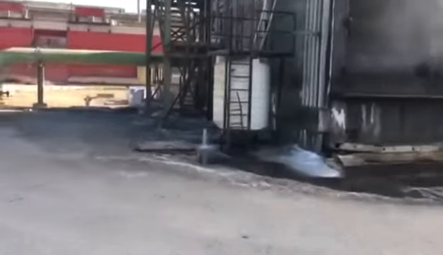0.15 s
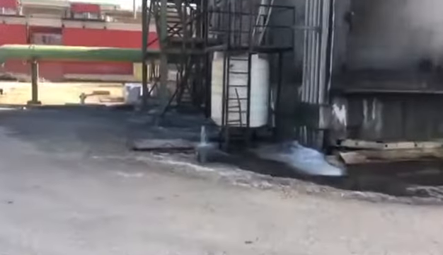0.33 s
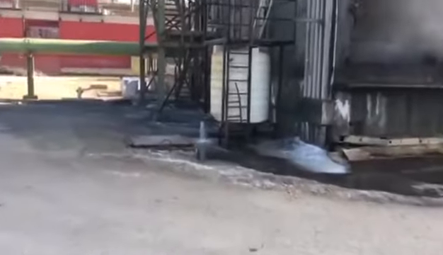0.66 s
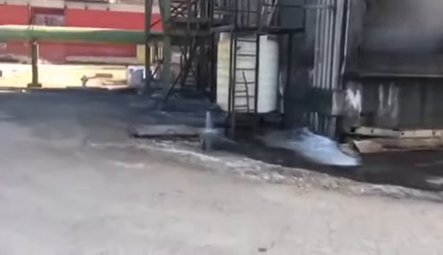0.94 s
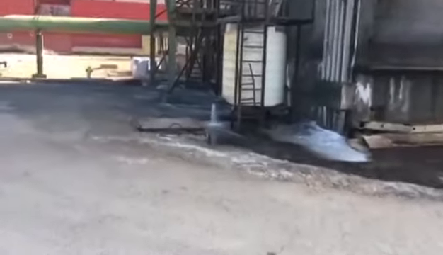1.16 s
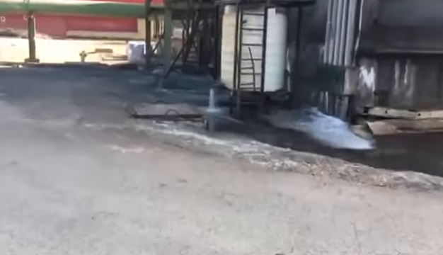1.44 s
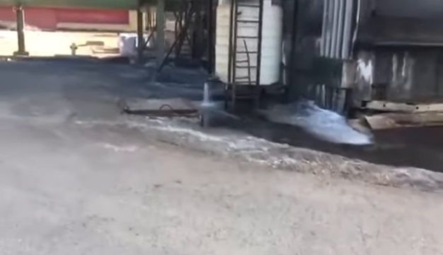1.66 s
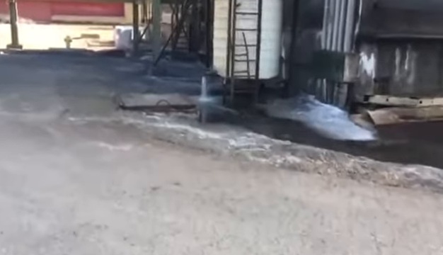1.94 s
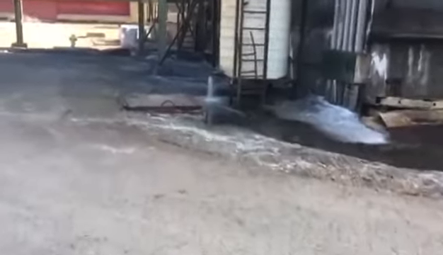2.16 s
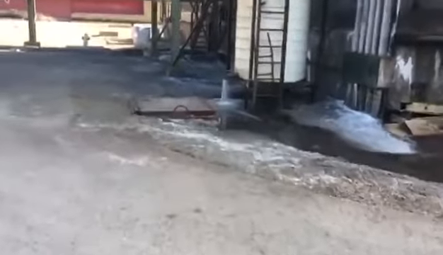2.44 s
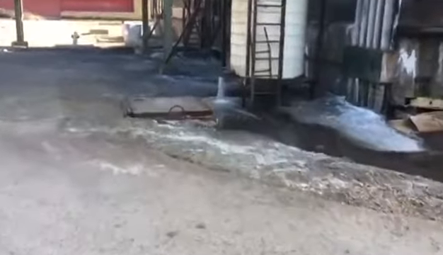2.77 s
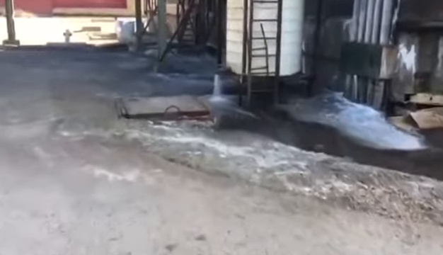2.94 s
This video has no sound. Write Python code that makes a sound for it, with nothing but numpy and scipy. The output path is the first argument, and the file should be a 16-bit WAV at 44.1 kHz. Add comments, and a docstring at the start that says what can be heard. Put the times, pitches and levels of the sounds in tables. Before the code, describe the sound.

Continuous water splash in an open industrial yard, heard from a few metres through one microphone, the same in both channels. Machinery rumbles unevenly, fans roar, a pump whines; a hollow drain ring swells briefly early on.

```python
"""Water gushes onto wet concrete some metres away in an industrial yard; one microphone feeds both channels.
From the start patchy noise and bursting drops hiss, over the plant's lumpy noise rumble and steadier roar;
a pump whines, a tone with shaft sidebands in a narrow noise band, swinging at first and then settling.
A narrow noise ring in the drain swells near 0.7 s; the outlet's ring drops by 1.7 s as a thin sine fades.
The water dips briefly near 2.16 s, and from 2.6 s the whine swings widely. The treble flickers throughout."""
import sys
import numpy as np
from scipy import signal
from scipy.fft import rfft, irfft, next_fast_len
from scipy.io import wavfile
from scipy.ndimage import uniform_filter1d, map_coordinates

SR = 44100
rng = np.random.default_rng(int(sys.argv[2]) if len(sys.argv) > 2 else 0)


def wav_record(signal):
    """Record a signal, one row per channel, as 16-bit PCM in the file named by sys.argv[1]."""
    frames = np.transpose(np.atleast_2d(signal))
    bounded = np.clip(frames, -1, 1)
    # unit amplitude maps onto the largest positive 16-bit level
    quanta = np.round(bounded * 32767).astype(np.int16)
    wavfile.write(sys.argv[1], SR, quanta)


def voltage_ratio(level):
    """Linear amplitude factor for a level in decibels (scalar or array-like)."""
    return 10 ** (np.asarray(level, float) / 20)


N = 137151

# Surge of the splash, as the level of its treble part: t/s, level/dB
SPLASH_SURGE = [(0.0, -32), (0.03, -33.5), (0.96, -33), (2.12, -34), (2.16, -36.5), (2.2, -34.5),
                (2.82, -34.5), (3.11, -34)]
# Spectrum of the splash, relative density: f/Hz, level/dB
SPLASH_COLOUR = [(500, -58), (900, -11.5), (1250, -5), (1600, -1.5), (2000, -1.5), (2400, -5.5),
                 (4500, -8.5), (4900, -10), (6900, -10.5), (8600, -13), (9000, -14), (9210, -31),
                 (9280, -95)]
# Water rushing in the outlet: t/s, level/dB
OUTLET_LEVEL = [(0, -36.5), (.7, -41.5), (1.3, -36.5), (1.7, -47), (2.4, -46.5), (3.11, -47.5)]
# Hollow ring in the drain: t/s, level/dB
DRAIN_LEVEL = [(0, -53.5), (.55, -50), (.72, -40), (.9, -55), (1.8, -49.5), (2.1, -60.5), (3.11, -59)]


def water():
    """A surging hiss with bursting drops, plus noise in the resonances of outlet and drain."""
    spray = patchy(depth_db=0.63) + voltage_ratio(-10) * droplets()
    whole_over_treble_db = 3.5
    splash_db = curve(SPLASH_SURGE) + whole_over_treble_db + 0.24 * wobble(9)
    splash = voltage_ratio(splash_db) * coloured(spray, SPLASH_COLOUR)
    outlet = voltage_ratio(curve(OUTLET_LEVEL) + 0.91 * wobble(9)) * resonant(hz=1265, width_hz=250)
    drain = voltage_ratio(curve(DRAIN_LEVEL) + 2.8 * wobble(7)) * resonant(hz=425, width_hz=60)
    return splash + outlet + drain


def droplets():
    """Dense short damped sines, one for each drop that bursts."""
    drops_per_s, middle_hz, spread, decay_cycles, size_range_db = 5000, 3500, 0.6, 3, 8
    when, pitch, size = rng.random((3, int(drops_per_s * N / SR)))
    # Bell-shaped scatter of pitch around the middle, on a log axis
    scatter = np.log(pitch / (1 - pitch)) / 2
    hz = np.clip(middle_hz * np.exp(spread * scatter), 600, 12000)[:, None]
    sample = np.arange(128)
    cycles = hz * sample / SR
    grains = np.sin(2 * np.pi * cycles) * np.exp(-2 * cycles / decay_cycles)
    grains = grains * voltage_ratio(size_range_db * size)[:, None]
    places = (when * N).astype(int)[:, None] + sample
    x = np.bincount(places.ravel(), grains.ravel(), minlength=N)[:N]
    return unit(np.diff(x, prepend=0))


def machinery():
    """The plant's two broad noises together, low and middle."""
    return rumble() + roar()


# Surges of the low machinery: t/s, level/dB
RUMBLE_SURGE = [(0.0, -29.5), (0.1, -37), (0.13, -32.5), (0.27, -35), (0.31, -29.5), (0.41, -36),
                (0.56, -33), (0.8, -34.5), (0.83, -33), (1.01, -39), (1.03, -32), (1.22, -37), (1.28, -31),
                (1.31, -39.5), (1.4, -30), (1.53, -34.5), (2.04, -34.5), (2.08, -40), (2.15, -30.5),
                (2.32, -37), (2.36, -32), (2.44, -37), (2.48, -31), (2.51, -38), (2.68, -31), (2.71, -37.5),
                (2.8, -31.5), (2.87, -37.5), (3.08, -31.5), (3.11, -44)]
# Spectrum of the low machinery, relative density: f/Hz, level/dB
RUMBLE_COLOUR = [(12, -50), (22, -22.5), (32, -14.5), (47, -1.5), (62, 0.5), (85, -4), (105, -2), (145, -8),
                 (200, -10.5), (290, -16), (360, -33), (500, -68.5)]


def rumble():
    """Low noise, its chance swells evened out so that its level follows the lumpy surges."""
    steady = evened(coloured(rng.standard_normal(N), RUMBLE_COLOUR))
    return voltage_ratio(curve(RUMBLE_SURGE) + 0.69 * wobble(6.9)) * steady


# Fan roar, before its 1.4 dB lift: t/s, level/dB
ROAR_SURGE = [(0.0, -41), (0.65, -37.5), (1.86, -37), (2.23, -34.5), (2.26, -39.5), (2.31, -36.5),
              (3.0, -37.5), (3.11, -35)]
# Spectrum of the fan roar, relative density: f/Hz, level/dB
ROAR_COLOUR = [(200, -49.5), (330, -8), (420, -5.5), (510, -4), (585, -1), (780, -4), (1000, -3),
               (1300, -4), (2000, -49)]


def roar():
    """Fan roar: patchy mid-range noise, steadier than the rumble."""
    noise = coloured(patchy(depth_db=1.63), ROAR_COLOUR)
    return voltage_ratio(curve(ROAR_SURGE) + 1.4 + 0.59 * wobble(7.9)) * noise


# Pump whine, tones and noise together, before their balance: t/s, level/dB
WHINE_LEVEL = [(0.0, -32), (0.08, -39.5), (0.14, -28.5), (0.3, -34.5), (0.34, -31), (0.44, -35),
               (0.56, -34.5), (2.1, -34), (2.62, -29.5), (2.63, -45), (2.68, -25), (2.7, -44),
               (2.81, -29.5), (2.85, -42), (2.92, -28), (2.99, -42.5), (3.02, -32), (3.11, -34)]
# Tone and its sidebands, before the group is set to rms 1: offset/shaft turns, level/dB
SIDEBANDS = [(-2, -7), (-1, -6), (0, 0), (1, -10)]


def pump():
    """A wavering tone with sidebands spaced by the shaft rate, inside resonant noise, and a thin tone."""
    whine_hz, shaft_hz, waver_hz = 1776, 33.5, 1.6
    t = np.arange(N) / SR
    # All partials share one pitch drift, in cycles
    drift = np.cumsum(waver_hz * wobble(12)) / SR
    tones = np.zeros(N)
    for turns, db in SIDEBANDS:
        cycles = (whine_hz + turns * shaft_hz) * t + drift + rng.random()
        tones += voltage_ratio(db + 2.5 * wobble(19)) * np.sin(2 * np.pi * cycles)
    halo = voltage_ratio(0.77 * wobble(9)) * resonant(hz=1762, width_hz=190)
    whine = voltage_ratio(-5.5) * unit(tones) + voltage_ratio(-2) * unit(halo)
    return voltage_ratio(curve(WHINE_LEVEL)) * whine + thin_tone()


# Faint tone that fades and partly returns: t/s, level/dB
THIN_LEVEL = [(0, -43.5), (1.3, -48), (1.9, -64), (3.11, -52)]


def thin_tone():
    """One faint sine of steady pitch, slightly unsteady in level."""
    t = np.arange(N) / SR
    return voltage_ratio(curve(THIN_LEVEL) + 0.95 * wobble(8.1)) * np.sin(2 * np.pi * 2056 * t)


def unit(x):
    """x at rms 1."""
    return x / np.sqrt(np.mean(x ** 2) + 1e-20)


def curve(rows):
    """One value per sample from (t/s, value) rows."""
    s, value = np.transpose(rows)
    return np.interp(np.arange(N) / SR, s, value)


def wobble(rate):
    """A smooth random curve, rate knots a second."""
    knots = rng.standard_normal(int(N * rate / SR) + 4)
    return map_coordinates(knots, [np.arange(N) * rate / SR])


def filtered(x, response):
    """x times a response of frequency."""
    m = next_fast_len(N + 8192)
    return irfft(rfft(x, m) * response(np.fft.rfftfreq(m, 1 / SR)), m)[:N]


def coloured(x, points):
    """x through (f/Hz, level/dB) points on a log frequency axis, at rms 1."""
    f, db = np.transpose(points)

    def response(hz):
        return voltage_ratio(np.interp(np.log(hz + 1), np.log(f + 1), db, -120, -120))

    return unit(filtered(x, response))


def resonant(hz, width_hz):
    """Noise in one resonance, at rms 1."""
    noise = rng.standard_normal(N)
    return unit(filtered(noise, lambda f: 1 / (1 + (2 * (f - hz) / width_hz) ** 2)))


def patchy(depth_db):
    """White noise with time-frequency patches of random gain, at rms 1."""
    z = signal.stft(rng.standard_normal(N + 512), nperseg=512)[2]
    field = uniform_filter1d(rng.standard_normal(z.shape), size=6, axis=0)
    field = uniform_filter1d(field, size=12, axis=1)
    return unit(signal.istft(z * voltage_ratio(depth_db * unit(field)), nperseg=512)[1][:N])


def evened(x):
    """x with its slow swells partly divided out, at rms 1."""
    window_s, evenness = 0.04, 0.9
    size = int(window_s * SR)
    power = np.abs(uniform_filter1d(uniform_filter1d(x ** 2, size), size))
    return unit(x / (power + 1e-3) ** (evenness / 2))


# How often a narrow treble band is silent: f/Hz, share of the time
SILENT_SHARE = [(3000, .002), (4700, .02), (7000, 0.045), (8600, 0.079), (8900, .2), (9100, .6),
                (9300, .75)]


def flicker(x):
    """Narrow treble bands fall silent for a moment, most often at the very top."""
    hz, _, z = signal.stft(x, SR, nperseg=1024)
    bins, frames = z.shape[-2:]
    # One throw for each patch of 4 bins by 3 frames, alike in both channels
    dice = rng.random((bins // 4 + 1, frames // 3 + 1))
    dice = dice.repeat(4, 0).repeat(3, 1)[:bins, :frames]
    share = np.clip(np.interp(hz, *np.transpose(SILENT_SHARE), left=0), 0, 1)
    return signal.istft(z * (dice > share[:, None]), SR, nperseg=1024)[1][..., :N]


def scene():
    """Everything reaches one microphone, which feeds both channels."""
    return np.tile(water() + machinery() + pump(), (2, 1))


def top_cut(x):
    """Nothing passes above the cut-off."""
    return signal.sosfilt(signal.butter(12, 9970, fs=SR, output="sos"), x)


def record(dry):
    """The treble of the whole mix flickers."""
    mix = flicker(dry)
    return top_cut(mix)


dry = scene()
out = record(dry)
wav_record(out)
```